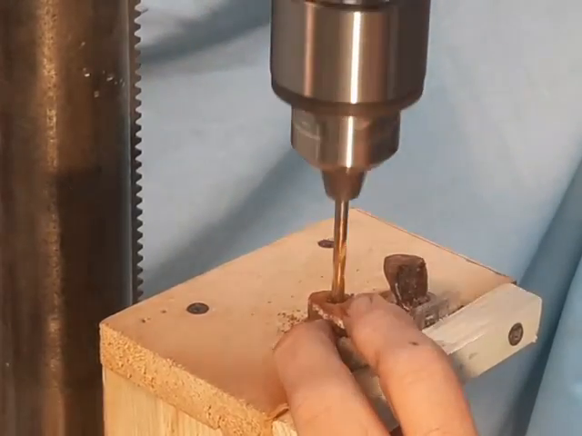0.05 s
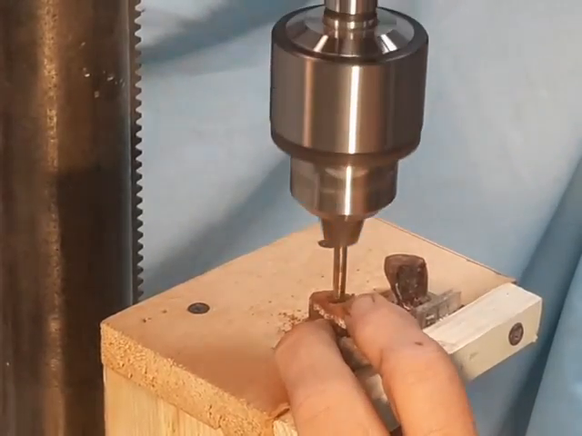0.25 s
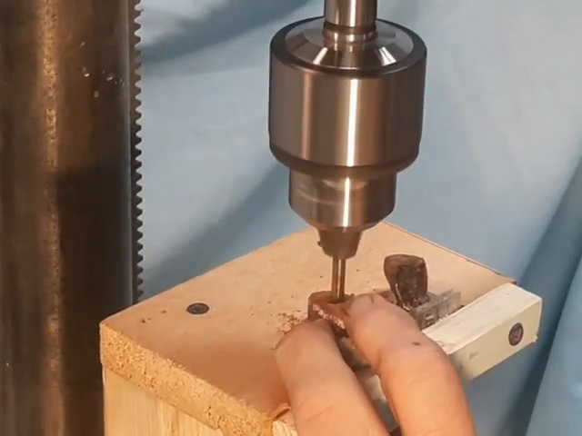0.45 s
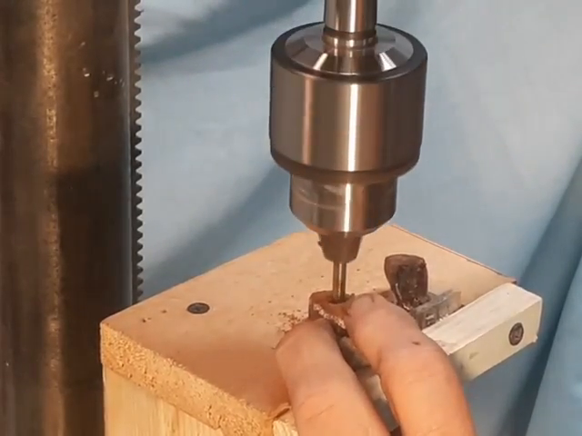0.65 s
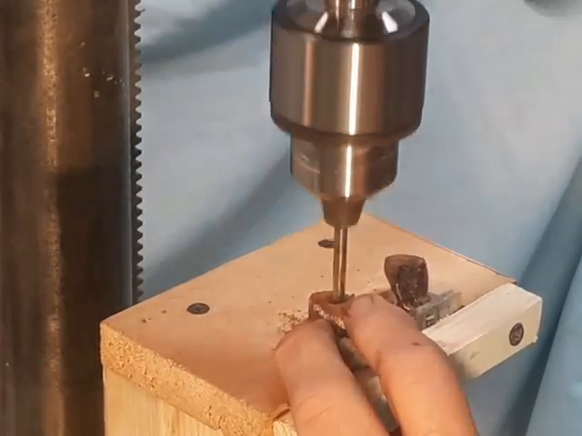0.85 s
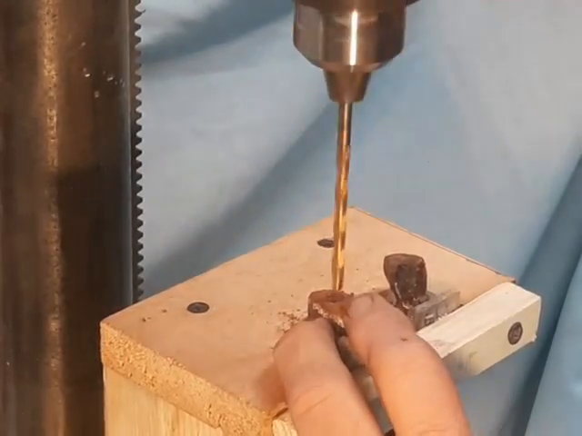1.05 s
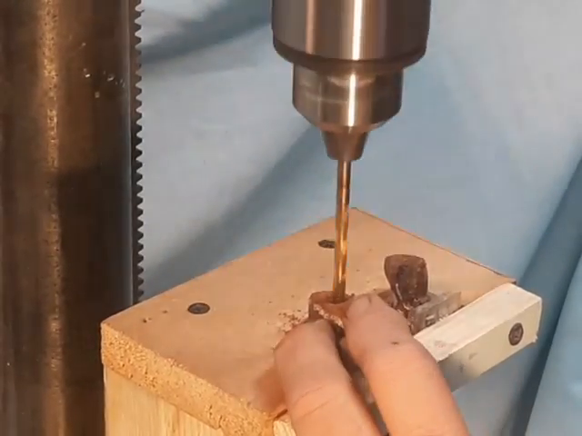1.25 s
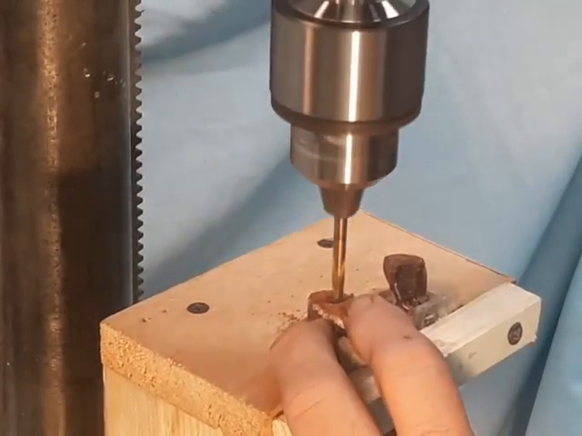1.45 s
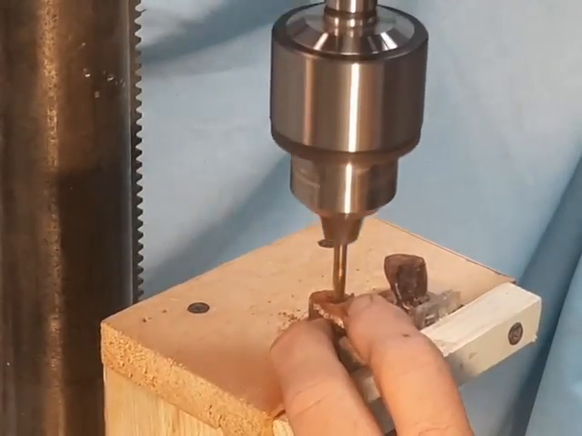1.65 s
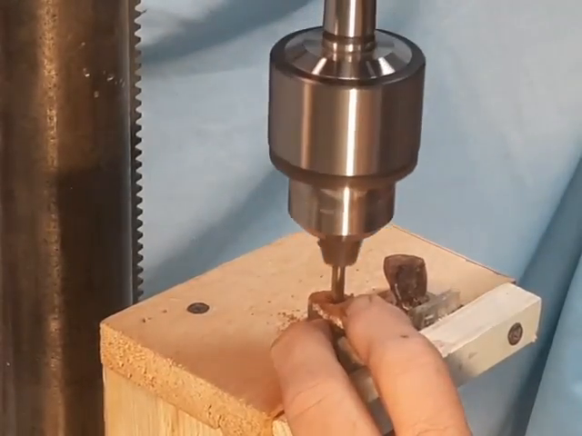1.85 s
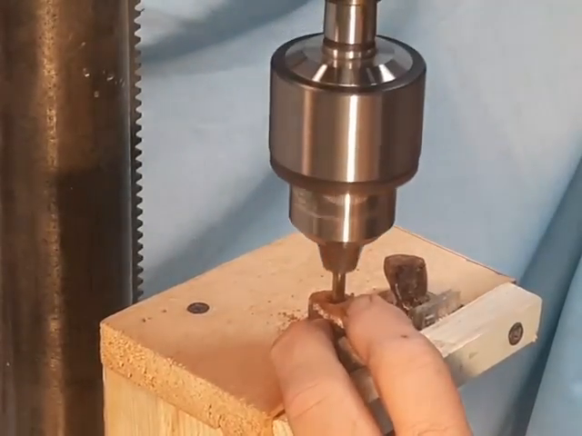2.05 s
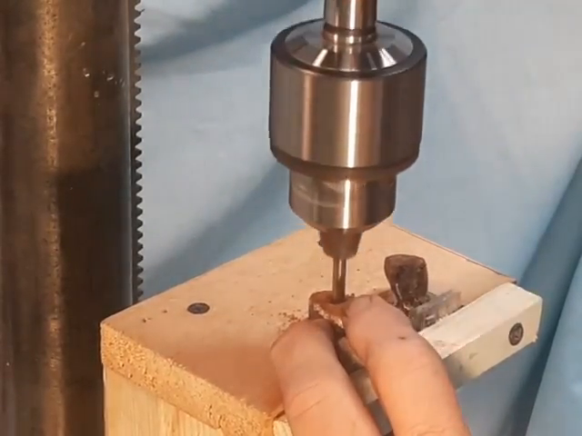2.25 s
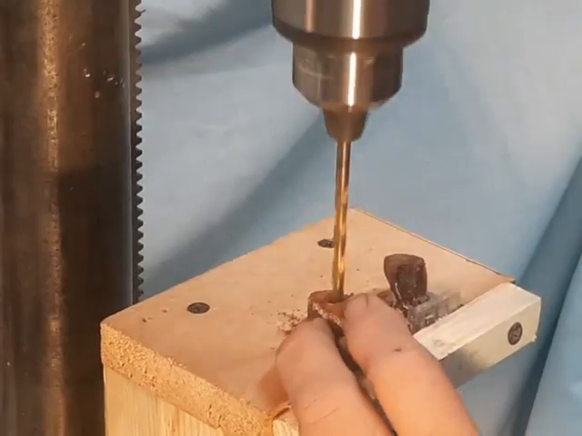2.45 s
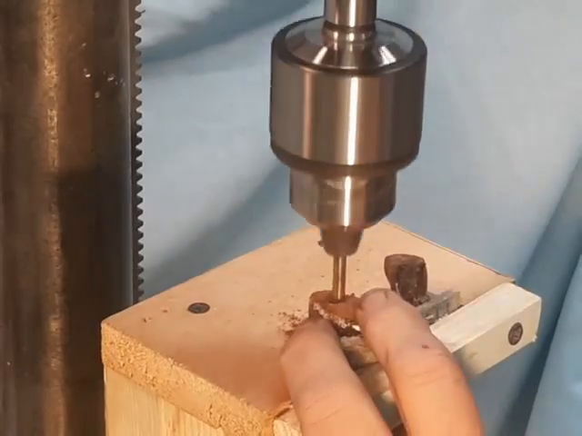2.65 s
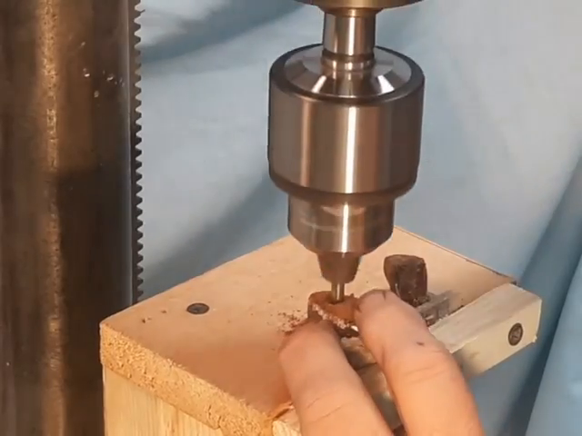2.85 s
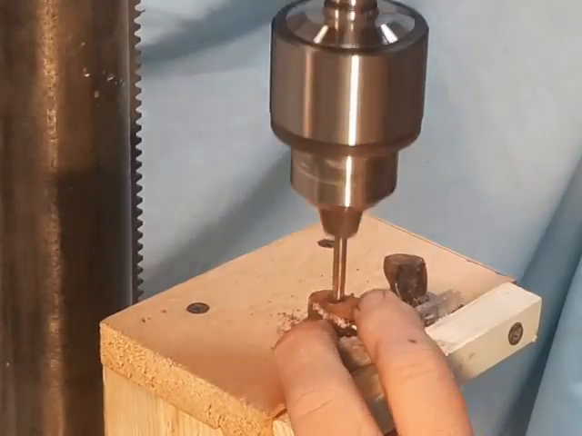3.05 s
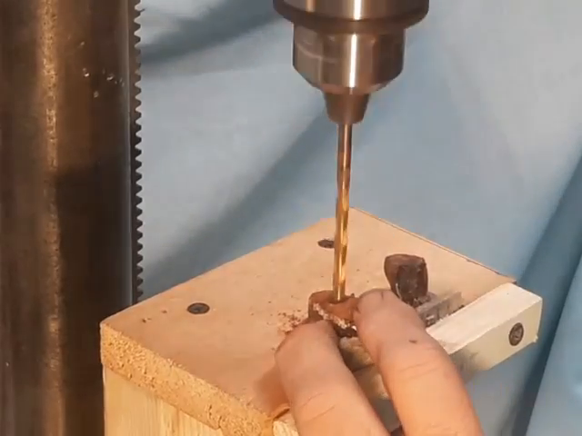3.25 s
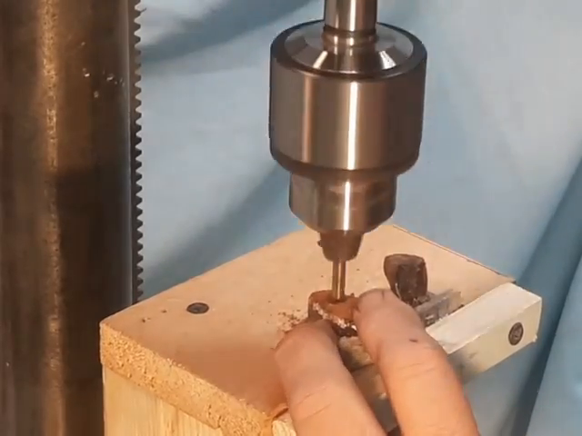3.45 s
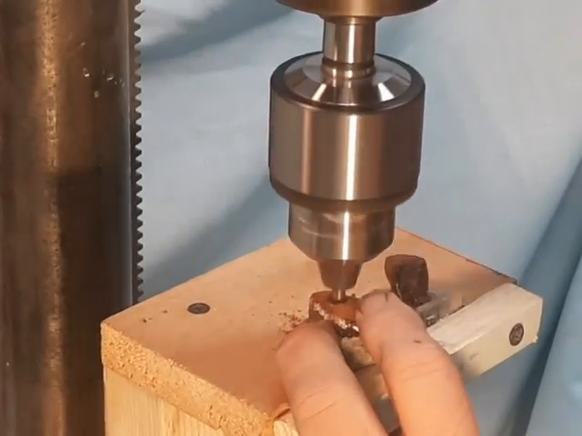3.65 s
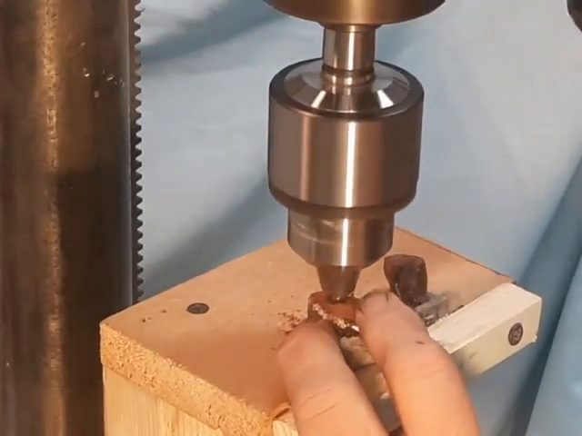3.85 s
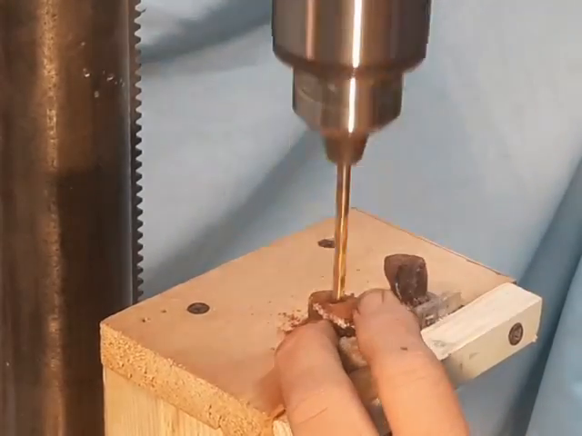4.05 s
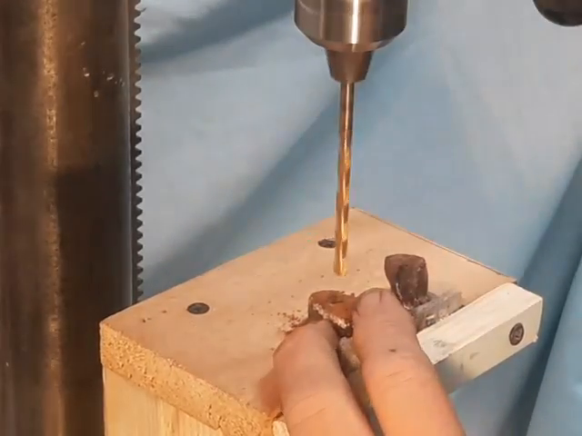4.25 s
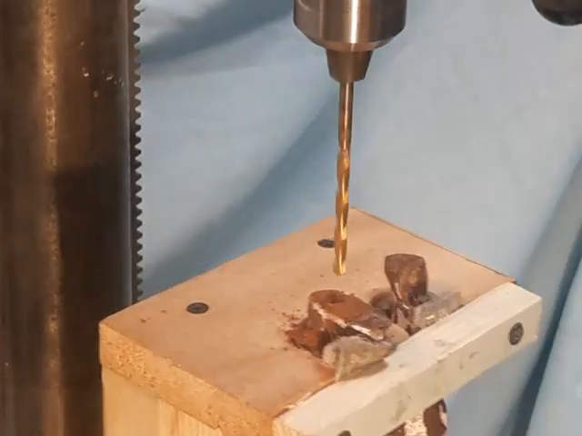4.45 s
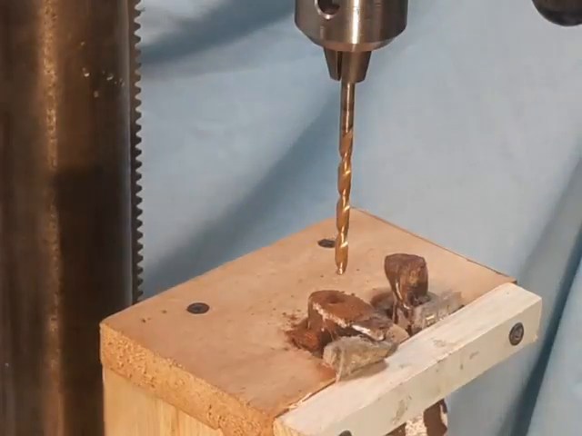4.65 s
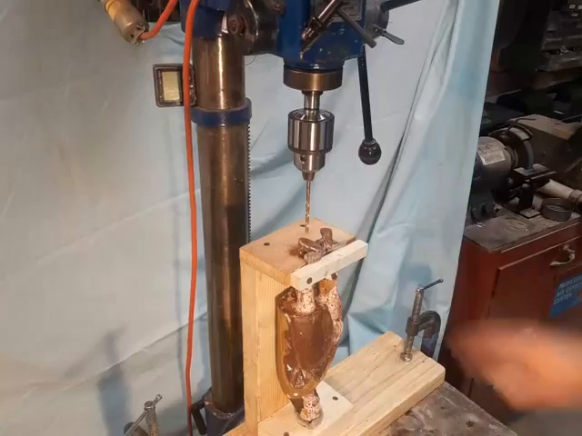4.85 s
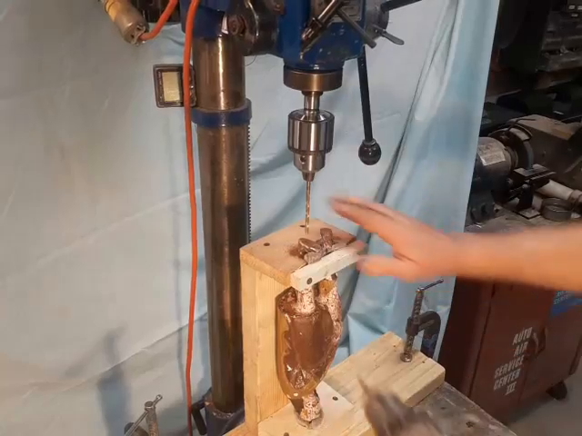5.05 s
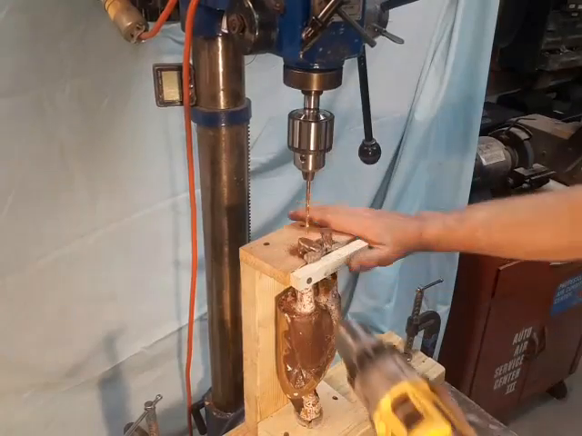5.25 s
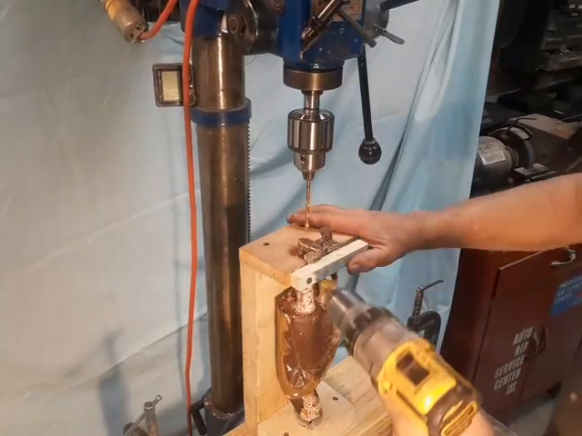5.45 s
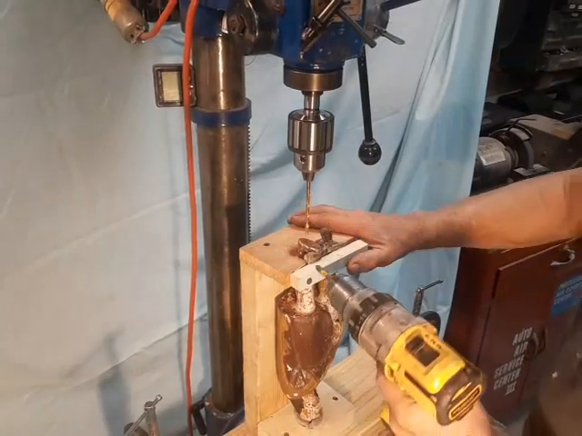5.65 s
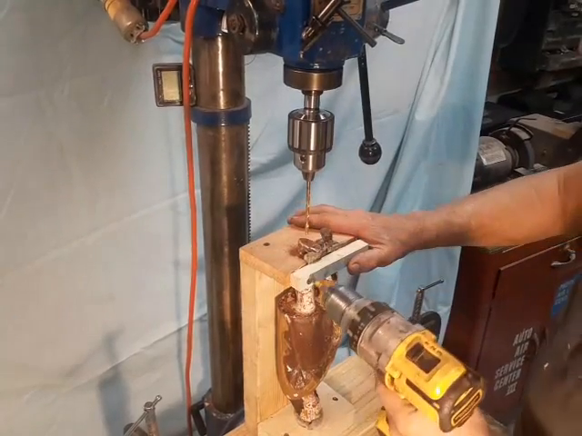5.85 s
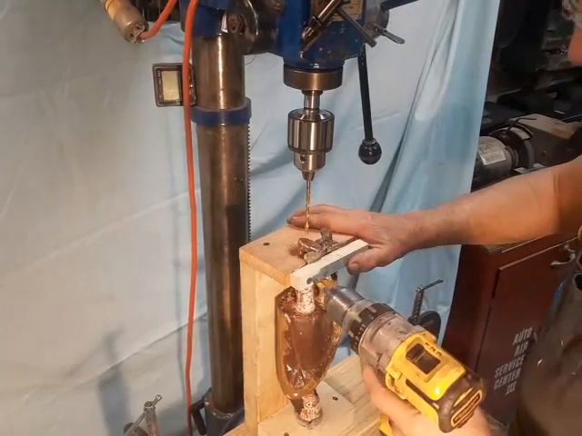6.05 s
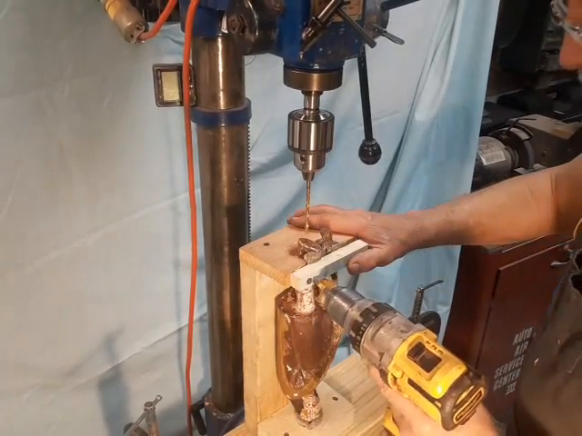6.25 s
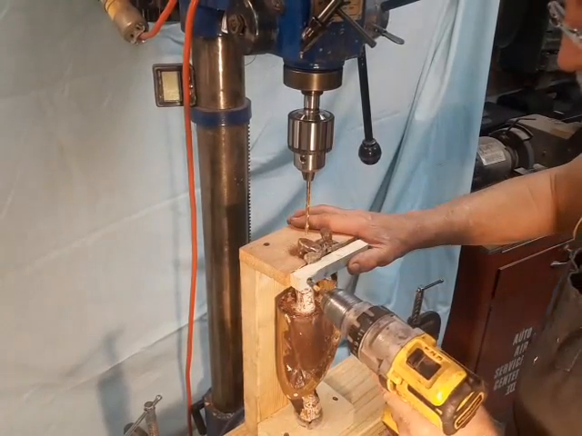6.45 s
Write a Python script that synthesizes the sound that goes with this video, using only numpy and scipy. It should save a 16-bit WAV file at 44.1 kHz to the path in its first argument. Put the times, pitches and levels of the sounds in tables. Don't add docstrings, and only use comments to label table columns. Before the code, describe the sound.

In a small workshop, a drill press runs close to the microphone with a steady gear rumble and breathy cutting hiss. The bit chirps and squeals in rapid chatter on each plunge, longest on the deepest one. It switches off abruptly with a small knock, leaving near silence. Then a hand brushes a wooden jig, and a cordless drill strikes it with a sharp metallic clack, followed by scrapes, rattles and woody thuds.

```python
import sys
import numpy as np
from scipy import signal
from scipy.fft import rfft, irfft, next_fast_len
from scipy.io import wavfile
from scipy.ndimage import uniform_filter1d

SR = 44100
rng = np.random.default_rng(int(sys.argv[2]) if len(sys.argv) > 2 else 0)


def unload_audio(sound):
    columns = np.transpose(np.atleast_2d(sound))
    steps = np.round(np.clip(columns, -1, 1) * 32767)
    wavfile.write(sys.argv[1], SR, steps.astype(np.int16))


def invert_db(x):
    u = np.asarray(x, float) / 20
    return 10 ** u


N = 287091
TIME = np.arange(N) / SR
SIDES = np.array([[.5], [-.5]])
CHANGE_S = 4.835
OFF_S = 4.488
TURN_HZ = 47.2

# (time [s], level [dB])
FEED = [(0.0, -59.5), (0.31, -58), (0.49, -62), (0.53, -57.5), (0.54, -58.5), (1.09, -57), (1.23, -63),
        (1.37, -58.5), (1.95, -61.5), (2.18, -57.5), (2.33, -61.5), (2.85, -58.5), (3.1, -62), (3.95, -59),
        (3.98, -62), (4.37, -62), (4.42, -56.5), (4.45, -60)]


def press():
    feed_db = np.interp(TIME, *np.transpose(FEED)) - np.mean(FEED, axis=0)[1]
    off_db = tent(0, OFF_S, 0, 234)
    hush_db = tent(0, OFF_S - .03, 0, 237)
    chips_db = 0.94 * drift(47.0) + 0.82 * turning()
    return head_rumble(feed_db, off_db, chips_db) + bit_hiss(feed_db, hush_db, chips_db) + hum(off_db)


# (frequency [Hz], level [dB per Hz])
RUMBLE = [(25, -60), (45, -52.5), (70, -41.5), (100, -21.5), (164, -13.5), (250, 1), (466, 0), (753, -7),
          (1100, -2), (1320, -14.5), (2050, -13), (2360, -20), (3000, -20)]
# (frequency [Hz], width [Hz], level to the rumble [dB])
HEAD = [(289, 37, -14), (330, 34, -35), (403, 24, -14), (471.1, 10, -5.5), (680.3, 16, -14.5),
        (999, 25, -17), (1115.5, 40, -9), (1690, 29, -31.5), (2309, 53, -9)]


def head_rumble(feed_db, off_db, chips_db):
    rumble = noise(RUMBLE, 1.6, 22.0, shared=0.2 * chips_db)
    shake = rng.standard_normal((2, N)) * invert_db(2.0 * drift(27.0))
    for hz, width_hz, level_db in HEAD:
        mode = ring(ring(shake, hz, 3.64 / width_hz), hz, 0.35 / width_hz)
        rumble += invert_db(level_db + 2.13 * drift(9.9) + 0.64 * off_db) * rms_one(mode)
    return invert_db(-50 + 0.42 * feed_db + off_db - 1.9 * SIDES) * rumble


# (frequency [Hz], level [dB per Hz])
CUTTING = [(880, -11.5), (1500, -8.5), (1660, -4.5), (2060, -12), (2320, -1.5), (2800, -9), (2980, -10.5),
           (3480, -8.5), (4450, -4), (5130, -10), (5600, -4.5), (6370, -3.5), (7010, -7), (7600, -16.5),
           (9880, -39), (16700, -120)]
# (frequency [Hz], level [dB per Hz])
AIR = [(4530, -28), (7700, 4), (9420, 0), (11400, 6.5), (13300, 4.5), (15100, 6), (16000, -6)]


def bit_hiss(feed_db, hush_db, chips_db):
    cutting = invert_db(-50.5 + 0.8 * feed_db + hush_db) * noise(CUTTING, 1.6, 22.0, shared=chips_db)
    air = invert_db(-58.5 + feed_db + hush_db) * noise(AIR, 0.69, 9.9, shared=chips_db * 1.2)
    return cutting + air


# (start [s], end [s], level [dB])
LOADS = [
    (0.0, .3, -61.5),
    (0.552, 1.093, -61.5),
    (1.32, 1.535, -61),
    (2.052, 2.203, -61.5),
    (2.588, 2.665, -61.5),
    (3.42, 3.488, -62),
    (4.362, 4.4, -63.5),
]


def hum(off_db):
    loaded = [level_db + tent(start, end, 151, 150) for start, end, level_db in LOADS]
    hum_db = np.maximum(np.max(loaded, axis=0), -73 + off_db)
    tone = 2.6 * np.sin(2 * np.pi * 119.6 * TIME + 0.36 * drift(3.0) + SIDES * 1.23)
    return invert_db(hum_db - 0.77 * SIDES) * tone


def turning():
    return np.cos(2 * np.pi * np.cumsum(TURN_HZ * (1 + 0.0364 * drift(6.2))) / SR)


# (first [s], last [s], peak [dB], first pitch [Hz], last pitch [Hz])
RUBS = [
    (2.205, 2.226, -38, 5100, 5500),
    (2.592, 2.609, -38, 4720, 4610),
    (3.442, 3.489, -40, 3560, 3390),
    (3.5, 3.52, -42.5, 4160, 4120),
]
# (time [s], peak [dB], pitch [Hz])
CATCHES = [(.535, -42, 6300), (0.574, -42, 5650), (.616, -42, 5550), (0.641, -39, 6600), (.705, -42, 6680),
           (0.877, -41, 6500), (1.838, -45, 6530), (2.071, -38.5, 5570), (2.146, -44, 3800),
           (2.167, -37.5, 6300), (2.169, -39.5, 3170), (2.615, -38.5, 3200), (2.63, -36, 3900),
           (2.673, -38.5, 6260), (3.014, -45, 5860), (3.021, -47.5, 4050), (3.074, -42, 6000),
           (3.483, -39.5, 2580), (3.488, -38, 5900), (4.385, -44, 5740), (4.42, -45, 6300),
           (4.444, -44, 6500)]
# (time [s],
# peak [dB], pitch [Hz])
CHATTER = [(0.2243, -43.1, 6060), (0.251, -37.5, 5900), (0.273, -32, 6090), (0.2846, -51, 6150),
           (0.294, -34, 6060), (0.3367, -39.1, 6450), (0.339, -43, 4990), (0.3582, -35.5, 6450),
           (0.4005, -40, 6390), (0.424, -42, 6280), (0.4442, -38.5, 6300), (0.4648, -44.5, 4630),
           (1.4783, -43, 5400), (1.497, -38.5, 5080), (1.5043, -31.5, 4710), (1.5147, -44, 4650),
           (1.525, -41, 4660), (1.533, -48, 4470), (1.5464, -41, 4850), (1.5694, -35, 4850),
           (1.616, -47, 5620), (1.6228, -41.3, 5600), (1.628, -46, 6150), (1.6435, -33.5, 5030),
           (1.6464, -42, 6150), (1.665, -39, 2740), (1.6693, -37, 5740), (1.6925, -29.5, 5530),
           (1.7131, -38, 4930), (1.7174, -44.8, 6470), (1.7183, -43.7, 3530), (1.7197, -46.4, 4960),
           (1.7392, -43.5, 6340), (1.7398, -40, 3690), (1.7598, -40, 6200), (1.7711, -39, 3890),
           (1.778, -37, 6130), (1.797, -39, 6420), (2.7835, -46, 4130), (2.7873, -46.4, 4020),
           (2.8009, -44, 4550), (2.8013, -40, 5300), (2.8229, -41, 4550), (2.844, -36.5, 5020),
           (2.8664, -36, 4760), (2.8861, -34.5, 5080), (2.9097, -33, 5000), (2.9282, -33, 5070),
           (2.9365, -49, 5620), (2.952, -33.5, 4770), (2.9616, -51, 4770), (2.9734, -39, 4660),
           (2.985, -50, 4630), (2.9933, -35, 4800),
           (3.5632, -42, 4960), (3.5634, -43.5, 5840), (3.5684, -40.5, 3970), (3.5856, -37.5, 4770),
                (3.5858, -37, 5350), (3.5906, -34, 4280), (3.5972, -45.3, 5480), (3.6051, -42, 4880),
                (3.606, -34, 5430), (3.6124, -42, 4850), (3.6255, -37.6, 5260), (3.6525, -43, 5600),
                (3.6543, -39, 4600), (3.6872, -39.5, 4860), (3.6972, -44.1, 4630), (3.7298, -37, 4830),
                (3.7353, -43, 4710), (3.7398, -41, 5100), (3.7482, -41, 4660), (3.772, -34, 4780),
                (3.7788, -39.9, 4930), (3.7933, -37, 5290), (3.7985, -37, 4910), (3.8128, -47, 5370),
                (3.8146, -41.6, 4710), (3.8198, -36.9, 5000), (3.8357, -41, 5480), (3.8407, -35.5, 4770),
                (3.845, -44.4, 5370), (3.848, -45.3, 4760), (3.8584, -36.5, 5150), (3.8643, -38.4, 4670),
                (3.8774, -39.1, 5280), (3.8854, -37.5, 4600), (3.8883, -40, 5500), (3.8965, -41.6, 5460),
                (3.9024, -43, 5350), (3.906, -36.6, 4580), (3.9085, -43.9, 5280), (3.9201, -38, 5260),
                (3.9276, -44, 4630), (3.933, -40, 4440), (3.9427, -35, 5100), (3.95, -38.3, 4330),
                (3.9609, -44.4, 5560), (3.9634, -38, 4720)]


def rubs():
    rows = []
    for (first, last, level_db, hz0, hz1), luck in zip(RUBS, rng.standard_normal((len(RUBS), 3, 8))):
        part = np.linspace(0, 1, round((last - first) * TURN_HZ) + 1)
        late, loud, sharp = luck[:, :len(part)]
        times = first + part * (last - first) + 0.00083 * late
        pitches = hz0 + part * (hz1 - hz0) + 76 * sharp
        rows += zip(times, level_db + loud, pitches)
    return rows + CATCHES + [(s, level_db + 1.5, hz) for s, level_db, hz in CHATTER]


def squeaks():
    out, rows = np.zeros((2, N)), rubs()
    before = 400
    t = np.arange(-before, 900) / SR
    for (s, level_db, hz), (long, glide, hand, pan, off) in zip(rows, rng.standard_normal((len(rows), 5))):
        width_s = .0018 * invert_db(1.2 * long)
        shape = np.exp(-.5 * (t / np.where(t < 0, width_s, 0.89 * width_s)) ** 2)
        tone = np.sin(2 * np.pi * hz * t * (1 + 3 * glide * t) + np.sign(hand) * 1.5 * SIDES)
        neighbour_hz = hz + np.sign(off) * 390.0
        tone = tone + 0.34 * np.sin(2 * np.pi * neighbour_hz * t + 3 * off * SIDES)
        tone = tone + 0.065 * (2 * tone ** 2 - 1.16)
        grit = ring(ring(rng.standard_normal((2, len(t))), hz, 0.0013), hz, 0.0013)
        tone = tone + 0.14 * rms_one(grit)
        at = round(s * SR) - before
        out[:, at:at + len(t)] += invert_db(level_db + 2.0 + 1.9 * pan * SIDES) * shape * tone
    return out


# (start [s], end [s], first level [dB], last level [dB], centre [Hz])
SQUEAL = [
    (.26, .44, -63, -60, 6200),
    (1.477, 1.545, -47.5, -57.5, 4750),
    (1.63, 1.7, -59, -60.5, 5370),
    (1.729, 1.79, -55, -54.5, 3800),
    (2.788, 2.986, -51.5, -53, 4894),
    (3.581, 3.713, -49.5, -47, 4950),
    (3.728, 3.951, -47, -43, 4965),
]


def squeal():
    spells = np.array([np.interp(TIME, [start, end], [db0, db1]) + tent(start, end, 689, 689)
                       for start, end, db0, db1, _ in SQUEAL])
    level_db = spells.max(0)
    hz = np.array(SQUEAL)[spells.argmax(0), -1]
    slip = signal.sosfilt(signal.butter(2, 620.0, fs=SR, output="sos"), rng.standard_normal((4, N)))
    phase = 2 * np.pi * np.cumsum(hz) / SR
    band = rms_one(slip[:2] * np.cos(phase) + slip[2:] * np.sin(phase))
    band = band + 0.35 * (band ** 2 - uniform_filter1d(band ** 2, size=9))
    throb_db = 4.5 * (2 * turning() ** 2 - 1)
    return invert_db(level_db - 6.5 + 2.0 * drift(67.0) + throb_db) * band


# (time [s], peak [dB])
TICKS = [(0.2703, -48), (0.532, -38), (1.4187, -47), (1.6901, -43), (2.143, -45), (2.7665, -41),
         (3.0719, -55), (3.1557, -57), (3.6262, -45), (3.7688, -46)]


def ticks():
    swell = np.zeros(N)
    swell[[round(s * SR) for s, _ in TICKS]] = invert_db(np.array(TICKS)[:, 1] - 7.0)
    t = np.arange(600) / SR
    swell = np.convolve(swell, t / 0.00067 * np.exp(1 - t / 0.0018))[:N]
    return swell * filtered(rng.standard_normal((2, N)), 2, 3500, "high")


# (time [s], bright peak [dB], bright pitch [Hz], dull level to the peak [dB], dull pitch [Hz])
KNOCKS = [(4.4662, -45.5, 6200, 7, 380), (4.519, -36.5, 4190, -5, 1016), (4.659, -72, 4100, -21, 700),
          (4.685, -61, 6520, -12, 720), (4.873, -49, 6040, -27, 250), (4.879, -39.5, 6300, -25, 250),
          (4.896, -44, 6500, -21, 250), (4.97, -60, 6640, -22, 500), (5.14, -40, 6500, -11, 1200),
          (5.561, -43, 6200, -7.5, 1056), (5.915, -15, 5940, -23, 710), (5.932, -31.5, 5700, -7, 1010),
          (5.945, -41, 1390, 0, 274), (6.0169, -19.5, 5400, -24, 770), (6.048, -32.5, 5400, -12.5, 790),
          (6.074, -37, 5400, -6, 740), (6.128, -22.5, 5240, -23, 433), (6.131, -46, 3000, 9, 600),
          (6.153, -33, 3000, 2.5, 484), (6.2111, -25.5, 6600, -21, 1260), (6.2128, -25, 2860, -23, 1260),
          (6.2135, -26, 2380, -23.5, 1270), (6.2673, -39, 3900, -16, 1210),
          (6.2693, -27.5, 2260, -15.5, 1194), (6.329, -51, 2380, 8, 353), (6.386, -44, 5430, 2.5, 830),
          (6.398, -38, 5900, -10, 846), (6.416, -39.5, 5400, -10, 530)]
# (frequency [Hz], level [dB], time to fall 60 dB [s])
CHUCK = [(2700, -14, 0.047), (3270, -12, 0.05), (4110, -10.5, 0.038), (4440, -12, 0.05), (4657, -3.5, 0.03),
         (5400, -10, 0.0089), (5920, -9, 0.039), (6040, 1, 0.013), (6420, 9.5, 0.01)]


def knocks():
    out, t = np.zeros((2, N + SR)), np.arange(SR // 4) / SR
    click = 1.0 * (t == 0)
    dull_top = signal.cheby2(6, 34, 7500, fs=SR, output="sos")
    lucks = rng.standard_normal((len(KNOCKS), len(CHUCK), 2, 1))
    for (s, level_db, hz, dull_db, dull_hz), luck in zip(KNOCKS, lucks):
        crack = rng.standard_normal((2, len(t))) * (invert_db(-60 * t / 0.066) + 2.8 * np.exp(-t / 0.0035))
        body = filtered(crack, 2, [0.24 * hz, 3.15 * hz], "band")
        bright = 0.6 * body / np.abs(body).max() + 0.18 * ring(click, hz, 0.008)
        on_chuck = 5.9 < s < 6.2 and hz > 4300
        for (mode_hz, mode_db, t60), chance in zip(CHUCK, luck):
            bright = bright + on_chuck * invert_db(mode_db - 14 + 3 * chance) * ring(click, mode_hz, t60)
        bright = filtered(bright, 5, 0.71 * hz, "high")
        snap = filtered(crack * np.exp(-t / 0.011), 2, 9500, "high")
        bright = signal.sosfilt(dull_top, bright) + (0.012 if on_chuck else 0.016) * snap
        if level_db < -27 and hz > 4000:
            scuff = round(0.0079 * SR)
            bright = signal.lfilter(np.hanning(scuff) * rng.standard_normal(scuff), 1, bright)
        thud = ring(ring(click + 0.04 * crack, dull_hz, 0.0063), dull_hz, 0.027)
        boards = filtered(crack, 2, [330, 1350], "band")
        thud = thud / np.abs(thud).max() + 1.02 * boards / np.abs(boards).max()
        hit = bright / np.abs(bright.mean(0)).max() + invert_db(dull_db + 1.0) * thud
        at = round(s * SR)
        out[:, at:at + len(t)] += invert_db(level_db - 2.4 * SIDES) * hit
    return out[:, :N]


# (time [s], peak [dB], pitch [Hz], time to fall 60 dB [s], sag [Hz per s])
THUMPS = [(4.463, -37, 283, 0.15, 0.0), (5.926, -39, 334, 0.12, 600), (5.95, -46, 288, .4, 48),
          (6.03, -52, 320, .15, 50), (6.094, -32.5, 512.6, 0.14, 300), (6.12, -29, 438.5, 0.22, 100),
          (6.122, -37, 832, .12, 50), (6.146, -25, 495, .07, 300), (6.155, -35, 352, 0.14, 50),
          (6.372, -34, 564, .08, 600), (6.385, -30, 832, 0.098, 50), (6.41, -39, 532, 0.11, 50),
          (6.445, -55, 830, 0.11, 50)]


def thumps():
    out, waver_db = np.zeros((2, N)), 2.0 * drift(30.0)
    for s, level_db, hz, t60, sag in THUMPS:
        t = np.maximum(TIME - s, 0)
        height = invert_db(level_db - 60 * t / t60 + waver_db) * (1 - np.exp(-t / 0.015))
        out += height * np.sin(2 * np.pi * (hz - sag * t / 2) * t + 0.18 * SIDES)
    return out


# (peak [s], rise [dB per s], dull level [dB], bright level [dB], fall [dB per s])
HAND = [(4.838, 7997, -77, -62.5, 85), (4.875, 1502, -82, -56.5, 300), (4.895, 606, -82, -56, 300),
        (5.143, 806, -47, -63, 144), (5.165, 796, -45, -40.5, 295), (5.29, 300, -64.5, -57, 116),
        (5.41, 136, -69.5, -60, 113), (5.45, 300, -69, -63, 300), (5.535, 3000, -61, -59.5, 143),
        (5.6, 600, -75, -63.5, 200), (5.567, 302, -68, -57, 256)]
# (frequency [Hz], level [dB per Hz])
HAND_LOW = [(180, -19.5), (300, -12.5), (408, -12.5), (796, -4), (887, -3.5), (2200, -15.5), (2860, -55),
            (4840, -120)]
# (frequency [Hz], level [dB per Hz])
HAND_HIGH = [(940, -26), (1600, -9), (2180, -8.5), (2420, -5), (2880, -4.5), (5180, -6), (6790, 1),
             (7920, -15), (13300, -10.5), (16000, -11)]


def hand_brushing():
    return rubbing(HAND, HAND_LOW, HAND_HIGH, grain_db=0.5)


# (peak [s], rise [dB per s], dull level [dB], bright level [dB], fall [dB per s])
SLIDE = [
    (5.41, 200, -90, -54.5, 122),
    (5.45, 300, -90, -52, 400),
    (5.54, 3000, -90, -50, 300),
]


def sliding():
    hiss = filtered(rng.standard_normal((2, N)), 2, (1500, 5130), "band")
    return invert_db(strokes(SLIDE)[1] + 1.3 * drift(50.0)) * rms_one(hiss)


# (peak [s], rise [dB per s], dull level [dB], bright level [dB], fall [dB per s])
TOOL = [(5.918, 20000, -46, -49, 211), (6.021, 9000, -48.5, -51, 148), (6.082, 900, -54, -52, 106),
        (6.11, 200, -46.5, -52, 250), (6.132, 5000, -37, -40.5, 400), (6.157, 600, -45, -59, 380),
        (6.216, 9000, -49.5, -56, 300), (6.332, 4000, -43.5, -74, 702), (6.375, 5000, -46, -54, 350),
        (6.392, 700, -47, -52, 350), (6.405, 600, -49.5, -47, 400), (6.421, 400, -45, -45.5, 900),
        (6.445, 600, -58, -62, 250)]
# (frequency [Hz], level [dB per Hz])
TOOL_LOW = [(150, -59), (250, -20), (333, -4), (451, -3.5), (511, 2.5), (702, -3.5), (827, 3.5), (908, -7),
            (1600, -25), (2080, -61), (3520, -120)]
# (frequency [Hz], level [dB per Hz])
TOOL_HIGH = [(940, -47), (1600, -21), (2260, -24), (2620, -3), (2880, -27), (3170, -4), (4940, -6),
             (5390, 3), (6110, -17), (7330, -30), (16000, -35)]


def tool_scraping():
    return rubbing(TOOL, TOOL_LOW, TOOL_HIGH, grain_db=3.5)


# (frequency [Hz], level [dB], time to fall 60 dB [s])
LOOSE = [(2650, -19, .05), (3233, -16, 0.042), (3730, -15, 0.038), (4110, -17.5, .05), (4470, -18, .02),
         (5400, -16.5, 0.017), (5730, -17, 0.04), (5860, -16.5, .05), (6400, -19, 0.034)]


def rattle():
    sizes = invert_db(3.0 * np.minimum(rng.exponential(1, (2, N)), 4))
    clicks = sizes * (rng.random(N) < 1500.0 / SR)
    clicks = clicks * invert_db(strokes(TOOL)[1])
    part = rng.integers(0, len(LOOSE), N)
    rings = sum(invert_db(level_db) * ring(clicks * (part == k), hz, t60)
                for k, (hz, level_db, t60) in enumerate(LOOSE))
    return invert_db(6.0) * filtered(rings, 4, [2400, 6600], "band")


def rubbing(rows, low, high, grain_db):
    dull_db, bright_db = strokes(rows)
    grain = grain_db * (drift(55.0) + 0.38 * drift(300.0))
    dull = invert_db(dull_db) * noise(low, 2.1, 8.0, shared=grain)
    return dull + invert_db(bright_db) * noise(high, 3.7, 33.0, shared=grain)


def strokes(rows):
    return np.max([tent(s, s, rise, fall) + [[dull_db], [bright_db]]
                   for s, rise, dull_db, bright_db, fall in rows], axis=0)


def room(x, t60):
    t = np.arange(SR // 2) / SR
    tail = rng.standard_normal((2, len(t))) * invert_db(-60 * t / t60) * (t > .004)
    return signal.fftconvolve(x, tail / np.sqrt(np.sum(tail ** 2, 1, keepdims=True)), axes=1)[:, :N]


# (start [s], end [s])
GATE = [
    (0.0, 4.598),
    (4.66, 4.9),
    (4.686, 5.3),
]


def gate():
    open_db = np.max([tent(start, end, 9000, 900) for start, end in GATE], axis=0)
    return np.where(TIME < CHANGE_S, invert_db(open_db), 1)


# (frequency [Hz], level [dB per Hz])
QUIET = [(25, -22), (53, 0), (120, -3), (240, -14.5), (400, -10.5), (700, -22), (4000, -26.5),
         (16000, -31.5)]
# (frequency [Hz], level [dB per Hz])
SHOP = [(15, -25), (25, -15), (59, 1.5), (94, 1), (137, -2), (175, -6.5), (309, -17), (1160, -28),
        (1610, -26), (1890, -29), (7920, -31.5), (14800, -26), (16000, -49)]


def room_floor():
    quiet = invert_db(-84) * noise(QUIET, .6, 5.0) * (TIME < CHANGE_S)
    return quiet + invert_db(-68) * noise(SHOP, 0.96, 2.1) * (TIME >= CHANGE_S)


# (frequency [Hz], likeness [0 to 1])
LIKENESS = [(30, 0.74), (120, 0.73), (400, 0.016), (1000, 0.066), (4000, 0.0037), (12000, .0)]


def noise(spectrum, patchy_db, rate, shared=0):
    size = next_fast_len(N)
    hz = np.maximum(np.arange(size // 2 + 1) * SR / size, 1)
    alike = np.clip(at_hz(LIKENESS, hz), -1, 1)
    mid, side = rfft(rng.standard_normal((2, size))) * invert_db(at_hz(spectrum, hz))
    pair = np.sqrt(1 + alike) * mid + 2 * SIDES * np.sqrt(1 - alike) * side
    lowest, highest = spectrum[0][0], spectrum[-1][0]
    pair *= (hz > lowest) & (hz < highest)
    out, half_octave = 0, 2 * np.log2(hz)
    for k in range(int(2 * np.log2(lowest)), int(2 * np.log2(highest)) + 2):
        band = irfft(pair * np.clip(1 - abs(half_octave - k), 0, 1), size)[:, :N]
        out = out + band * invert_db(patchy_db * drift(rate))
    out = out * invert_db(shared)
    return out / np.sqrt(np.mean(out.mean(0) ** 2))


def drift(rate):
    r = np.exp(-80 * np.pi * rate / SR)
    slow = signal.lfilter([1], [1, -2 * r, r * r], rng.standard_normal(N // 40 + 2002))[2000:]
    return np.interp(np.arange(N) / 40, np.arange(len(slow)), rms_one(slow))


def ring(x, hz, t60):
    r, w = invert_db(-60 / (t60 * SR)), 2 * np.pi * hz / SR
    return signal.lfilter([0, np.sin(w)], [1, -2 * r * np.cos(w), r * r], x + 1e-18)


def filtered(x, order, hz, kind):
    return signal.sosfilt(signal.butter(order, hz, kind, fs=SR, output="sos"), x)


def tent(start, end, rise, fall):
    return -abs(rise) * np.maximum(start - TIME, 0) - abs(fall) * np.maximum(TIME - end, 0)


def at_hz(points, hz):
    table_hz, values = np.transpose(points)
    return np.interp(np.log(hz), np.log(table_hz), values)


def rms_one(x):
    return x / np.sqrt(np.mean(x ** 2) + 1e-20)


def scene():
    bit = squeaks() + squeal() + ticks()
    hits = knocks() + thumps()
    handling = hand_brushing() + tool_scraping() + rattle() + sliding()
    echoes = room(invert_db(-13.0) * bit + invert_db(-7.5) * hits, t60=0.22)
    work = press() + bit + hits + echoes
    return work * gate() + handling * invert_db(-1.5 * SIDES) + room_floor()


def roll_off(x):
    return signal.sosfilt(signal.butter(12, 16470, fs=SR, output="sos"), x)


def record(dry):
    b, a = signal.iirnotch(7600, 14.0, SR)
    mic = 0.39 * dry + 0.52 * signal.lfilter(b, a, dry)
    mic = signal.sosfilt(signal.ellip(12, .5, 80, 15790, fs=SR, output="sos"), mic)
    return roll_off(mic)


dry = scene()
out = record(dry)
unload_audio(out)
```